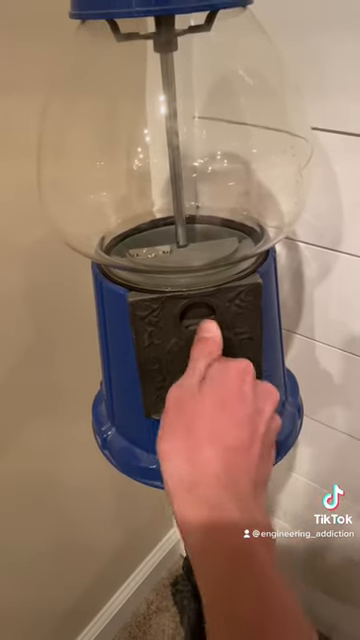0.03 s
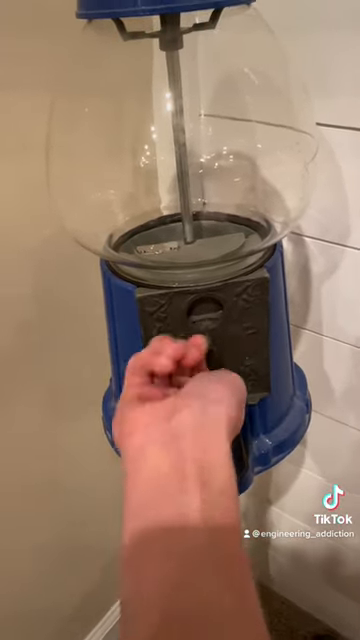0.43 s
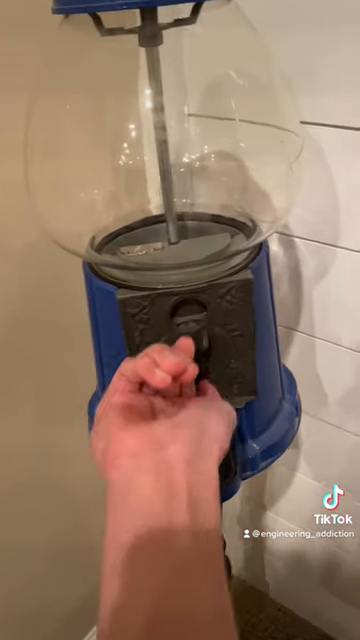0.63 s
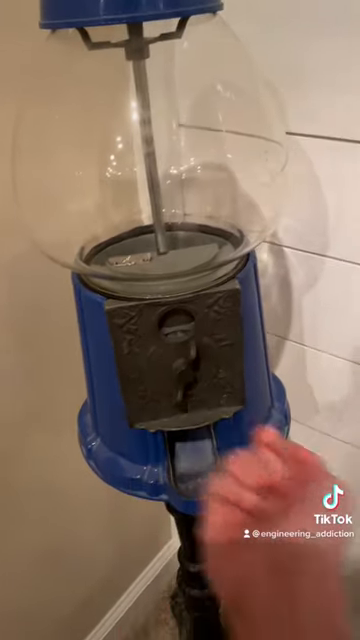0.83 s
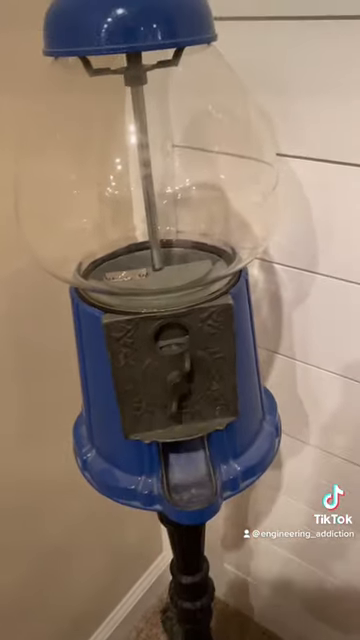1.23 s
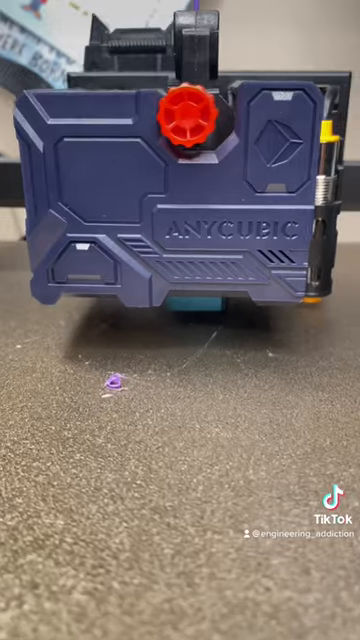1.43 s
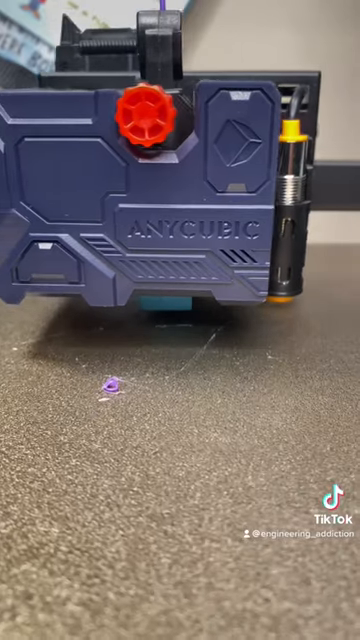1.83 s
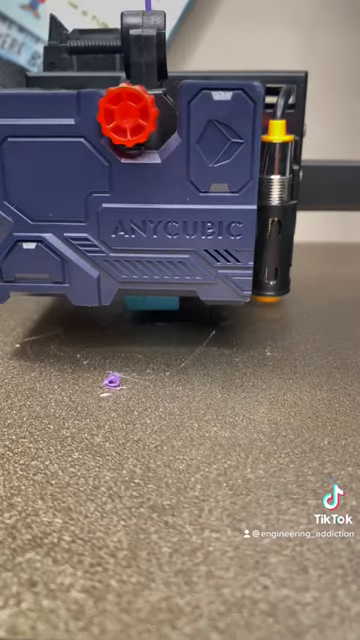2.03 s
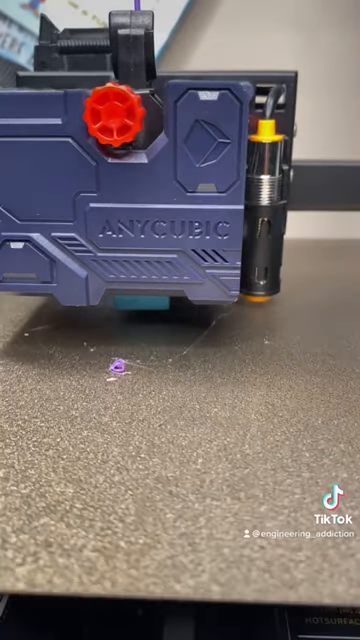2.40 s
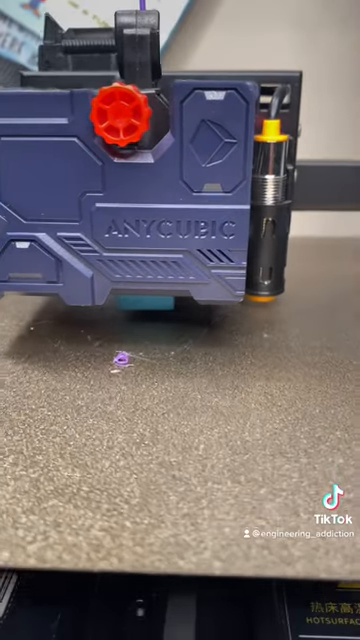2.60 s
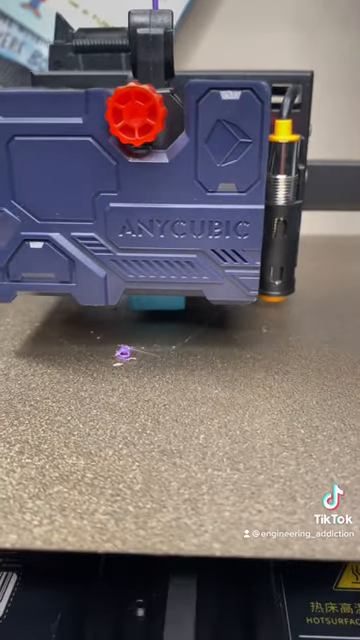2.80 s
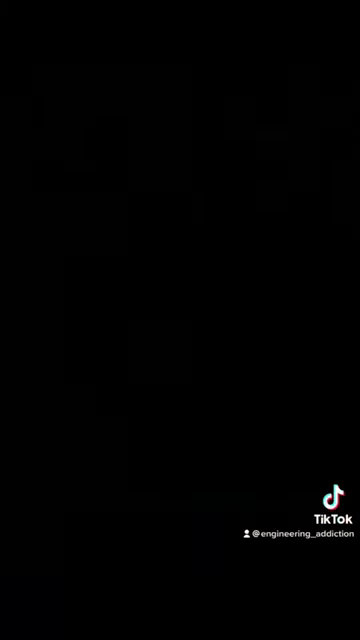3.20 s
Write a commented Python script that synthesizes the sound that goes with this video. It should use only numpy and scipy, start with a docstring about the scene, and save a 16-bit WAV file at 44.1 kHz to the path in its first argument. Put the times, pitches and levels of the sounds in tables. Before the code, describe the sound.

A gumball machine crank ratchets with sharp snaps, knocks and gritty grinding in a small room. After a short lull, a 3D printer's fan abruptly rushes close up with a thin motor whine, then drops to a low hum.

```python
"""Sharp snaps, knocks and grinding: a hand cranks a gumball machine. The pawl snaps over its teeth,
the gears knock and grind, and the metal housing rings in a small room. Then, abruptly, a 3D printer
close up: fan rush with blade tones, a thin whine, a drone and a gliding motor. The rush drops at the
end and leaves a low hum. Soft handling bumps run through both scenes."""
import sys
import numpy as np
from scipy import signal
from scipy.fft import rfft, irfft
from scipy.io import wavfile

SR = 44100
rng = np.random.default_rng(int(sys.argv[2]) if len(sys.argv) > 2 else 0)


def generate_wav(sig):
    """Save sig (samples, or channels by samples) to the path in sys.argv[1] as 16-bit PCM at SR."""
    pcm = np.round(np.clip(np.atleast_2d(sig).T, -1, 1) * 32767).astype(np.int16)
    wavfile.write(sys.argv[1], SR, pcm)


N = 147735
T, HZ = np.arange(N) / SR, np.fft.rfftfreq(N, 1 / SR)

# Stereo images. Each row: frequency in Hz, coherence 0-1, left lead in rad, left minus right in dB.
CRANK_STEREO = [(60.1, 1, -1, 0), (400, 0.06, 0.5, -5), (950, 1, 1, -1), (2142, 0.6, -1.5, -0.5),
                (3500, 0, 4.5, -2), (4340, 1, 8, -4), (5160, .85, 7.5, -1), (7170, 0.96, 9, -0.5),
                (9800, 0.5, 13, 0), (12850, 0.99, 15, 0), (16020, 0.9, 18.5, -0.5)]
PRINTER_STEREO = [(60, 0.95, 0, 0.5), (201, 0.92, 0.5, 0), (426, 1, 1, 4.5), (1190, 1, 1.97, 10.5),
                  (1600, 0.092, -0.5, 8.5), (2080, 0.085, 3, -8.5), (3070, 0.66, 4, 0),
                  (5130, 0.43, 3.5, -1.5), (5280, 1, 7.5, 1), (6940, 1, 8.5, -3), (8600, 1, 11, 0.5),
                  (11000, 1, 12, 0), (13300, 1, 16, 0)]
# Spectrum of snaps and rattle. Each row: frequency in Hz, level in dB.
SNAP_SPECTRUM = [(100, -30), (300, -7.5), (700, -8), (1400, 0), (2400, 6), (3500, 2), (5500, 4.5),
                 (7200, -2.5), (10000, 0), (12500, -3), (15200, -11.5), (16300, -31)]


def amp(db):
    """Decibels to gain."""
    return 10 ** (np.asarray(db) / 20)


def unit(x):
    """Scale to rms 1."""
    return x / np.sqrt(np.mean(x ** 2) + 1e-20)


def over_hz(table, hz):
    """Interpolate a table on a log-frequency axis."""
    row_hz, value = np.transpose(table)
    return np.interp(np.log(hz + 1), np.log(row_hz + 1), value)


def columns(table, at):
    """Interpolate the other columns along the first."""
    first, *rest = np.transpose(table)
    return [np.interp(at, first, column) for column in rest]


def level(curve):
    """Gain over time from rows of seconds and dB."""
    return amp(columns(curve, T)[0])


def drift(rate_hz):
    """Low-passed random motion, rms 1."""
    return unit(irfft(rfft(rng.standard_normal(N)) / (1 + (HZ / rate_hz) ** 4), N))


def flicker(depth_db, rate_hz):
    """Randomly wavering gain, rms 1."""
    return unit(amp(depth_db * drift(rate_hz)))


def noise(spectrum, stereo, tilt_db_oct=0):
    """Coloured stereo noise, rms 1."""
    coherence, lead_rad, balance_db = columns(stereo, HZ)
    coherence = np.clip(coherence, 0, 1)
    common, separate = rfft(rng.standard_normal((2, N)))
    left = common * amp(balance_db / 2)
    right = coherence * common + np.sqrt(1 - coherence ** 2) * separate
    right = right * np.exp(-1j * lead_rad) * amp(-balance_db / 2)
    shape_db = over_hz(spectrum, HZ) + tilt_db_oct * np.log2(np.maximum(HZ, 300) / 4000)
    return unit(irfft(np.array([left, right]) * amp(shape_db), N))


def tone(hz, lead_rad=0):
    """Stereo sine, rms 1, left leading by lead_rad."""
    phase = 2 * np.pi * (np.cumsum(hz * np.ones(N)) / SR + rng.random())
    return np.sqrt(2) * np.sin([phase, phase - lead_rad])


def fade(t, t60_s):
    """Unity until time zero, then exponential decay."""
    return np.exp(-np.log(1000) * np.maximum(t, 0) / t60_s)


def ramp(start_s, rise_s):
    """Linear rise from 0 to 1."""
    return np.clip((T - start_s) / rise_s, 0, 1)


def blow(start_s, rise_s, t60_s):
    """Impact envelope: linear attack, exponential decay."""
    return ramp(start_s, rise_s) * fade(T - start_s - rise_s, t60_s)


def swell(start_s, length_s):
    """Half-sine envelope."""
    return np.sin(np.pi * ramp(start_s, length_s))


def room_tone():
    """Faint low noise behind the gumball machine."""
    # Each row: time in seconds, level in dB.
    loudness = [(0, -56.5), (.75, -57), (.95, -62), (1.2, -56.5), (1.235, -64), (1.3, -61.5)]
    # Each row: frequency in Hz, level in dB.
    spectrum = [(20, -23), (55, 3), (90, -12), (140, -13.5), (220, -19.5), (600, -28.5), (1500, -34.5),
                (5000, -41), (10000, -49.5), (16000, -60)]
    return level(loudness) * noise(spectrum, CRANK_STEREO)


def room_reverb(x):
    """Diffuse tail; each band decays at its own rate."""
    # Each row: frequency in Hz, T60 in seconds.
    decay = [(150, .35), (700, 0.23), (2000, 0.49), (4200, 0.64), (5100, .5), (5700, 0.67), (7000, 0.25),
             (10000, 0.28), (16000, 0.35)]
    hz, t, bands = signal.stft(rng.standard_normal((2, SR)), SR, nperseg=256)
    bands = bands * fade(t, over_hz(decay, hz)[:, None])
    tail = signal.istft(bands, SR)[1][:, :SR] * ramp(0, rise_s=0.0053)[:SR]
    return signal.fftconvolve(x, tail / np.linalg.norm(tail[0]), axes=1)[:, :N]


def handling():
    """Handling bumps: short low sines and hollow bursts of band noise."""
    # Each row: start in seconds, pitch in Hz, level in dB, length in seconds.
    thumps = [(0.125, 240, -30.5, .012), (1.303, 406, -28, 0.01), (.765, 150, -48, 0.034),
              (0.804, 143, -51, 0.022), (0.976, 135.5, -50.5, 0.049), (1.155, 98.2, -59, 0.038),
              (1.506, 66, -34.5, 0.062), (2.243, 80, -26, 0.044), (2.619, 56, -25.5, 0.038),
              (2.773, 103.8, -27.5, 0.038), (3.173, 123, -29, 0.011), (3.198, 69, -29, 0.041)]
    # Each row: start in seconds, centre in Hz, level in dB, length in seconds, width in octaves.
    clunks = [(0.122, 286, -36.5, 0.018, 1), (0.754, 248, -64, 0.048, 0.46),
              (0.955, 353, -65.5, 0.083, 0.6), (1.146, 560, -57, 0.014, 0.35),
              (1.147, 1497, -56, 0.0046, 0.3), (1.15, 1536, -74, 0.1, 0.27),
              (3.172, 710, -40, 0.0082, 0.41), (3.213, 1730, -46, 0.055, 0.14)]
    out = np.zeros(N)
    for start_s, hz, db, length_s in thumps:
        out += amp(db) * swell(start_s, length_s) * np.sin(2 * np.pi * hz * (T - start_s))
    white = rfft(rng.standard_normal(N))
    for start_s, hz, db, length_s, width_oct in clunks:
        band = irfft(white / (1 + (np.log2((HZ + 1) / hz) / width_oct) ** 4), N)
        out += amp(db) * swell(start_s, length_s) * unit(band)
    return out


def hum():
    """Low rising hum over a softer rush."""
    # Each row: time in seconds, pitch in Hz, level in dB.
    glide = [(3.235, 115.7, -71), (3.255, 124, -33.5), (3.315, 129, -35), (3.35, 141.5, -32)]
    # Each row: time in seconds, level in dB.
    rush_loudness = [(3.14, -39), (3.24, -37.5), (3.29, -40.5), (3.35, -39)]
    # Each row: frequency in Hz, level in dB.
    rush_spectrum = [(20, -11), (55, 9), (150, 8), (350, -5.5), (600, -10), (1800, -13), (3500, -10.5),
                     (6000, -20), (11000, -30.5), (16000, -46)]
    hz, db = columns(glide, T)
    rush = level(rush_loudness) * noise(rush_spectrum, PRINTER_STEREO)
    return rush + (T > glide[0][0]) * amp(db) * tone(hz)


def fan():
    """Turbulent air, wavering blade tones and one thin clean tone that creeps upward."""
    # Each row: time in seconds, level in dB.
    rush_loudness = [(1.3, -32.5), (1.9, -32), (2.25, -32), (2.45, -31.5), (2.65, -32), (2.9, -32),
                     (3.14, -32.5)]
    # Each row: frequency in Hz, level in dB.
    rush_spectrum = [(20, -53), (42, 2), (75, -2.5), (105, -9), (127, -2.5), (180, -11), (240, -8.5),
                     (340, -5), (420, 0), (500, -5), (640, -5.5), (780, -10.5), (1200, -7.5), (1370, -12),
                     (1580, -10), (1850, -13), (2250, -13.5), (2500, -10.5), (3050, -13.5), (3300, -16),
                     (4700, -20), (5100, -25.5), (6000, -24), (8000, -36.5), (10000, -34.5), (12000, -40.5),
                     (14000, -49), (16000, -66)]
    # Each row: pitch in Hz, level in dB, left lead in rad, rms wander in Hz.
    blade_tones = [(125.6, -50, -0.5, 4), (323, -57, 1.2, 2.4), (528.6, -36.5, 1.5, 0.41),
                   (696, -52.5, 0, 4.5), (847, -49.5, 4.5, 3.7), (1049, -53.5, 0.1, 2.7),
                   (1157, -52.5, 0.5, 2.9), (1197, -55.5, 1, 3.5), (1485, -52, 1, 4.3), (2035, -54, 8, 3.6),
                   (2635, -46, 9.5, 8.2), (2920, -48.5, 4, 8.3), (3230, -66, 1, 12), (3460, -59, 8.5, 5)]
    # Each row: time in seconds, pitch in Hz, level in dB.
    thin_tone = [(1.3, 2311, -45.5), (1.9, 2331, -44.5), (2.35, 2333, -44), (2.56, 2338, -48),
                 (2.7, 2334, -45), (3.14, 2363, -46)]
    out = level(rush_loudness) * amp(0.5 * drift(rate_hz=50)) * noise(rush_spectrum, PRINTER_STEREO)
    for hz, db, lead_rad, wander_hz in blade_tones:
        gain = amp(db + 1.44 * drift(rate_hz=15))
        out += gain * tone(hz + wander_hz * drift(rate_hz=24.2), lead_rad)
    thin_hz, thin_db = columns(thin_tone, T)
    return out + amp(thin_db) * tone(thin_hz, lead_rad=1.7)


def motor_whine(hz=5231.4, octave_db=-22):
    """Thin whine of near-steady pitch that fades away."""
    # Each row: time in seconds, level in dB.
    loudness = [(1.3, -62.5), (1.35, -46.5), (1.7, -49.5), (2, -53), (2.2, -59), (2.39, -61), (2.47, -80)]
    gain = level(loudness) * flicker(depth_db=2.2, rate_hz=19)
    return gain * (tone(hz + drift(rate_hz=12)) + amp(octave_db) * tone(2 * hz))


def motor_drone(hz=415.5, wander_hz=22):
    """Rough drone that swells and ebbs, louder on the left."""
    # Each row: time in seconds, level in dB.
    loudness = [(1.3, -39), (1.9, -51), (2.22, -35), (2.35, -64), (2.52, -42.5), (2.62, -35.5), (2.76, -34),
                (2.86, -55), (3.14, -55)]
    gain = level(loudness) * flicker(depth_db=3.2, rate_hz=13) * amp([[2], [-2]])
    return gain * tone(hz + wander_hz * drift(rate_hz=43.3), lead_rad=1.0)


def motor_whistle(jitter_hz=75, octave_db=-25):
    """Whistle that sinks and climbs again; fast pitch jitter makes it fuzzy."""
    # Each row: time in seconds, pitch in Hz, level in dB.
    glide = [(2.42, 5150, -66), (2.48, 5130, -45), (2.53, 4960, -44.5), (2.585, 4660, -53),
             (2.66, 4090, -44), (2.7, 3970, -52), (2.745, 3890, -50), (2.8, 4100, -41), (2.885, 4685, -52),
             (2.945, 4970, -46), (2.99, 5080, -55), (3.04, 5190, -55), (3.1, 5230, -68)]
    hz, db = columns(glide, T)
    hz = hz + jitter_hz * drift(rate_hz=330)
    gain = amp(db) * flicker(depth_db=2, rate_hz=70)
    return gain * (tone(hz, lead_rad=4.57) + amp(octave_db) * tone(2 * hz, lead_rad=5.5))


def housing_ring(x):
    """The metal body's modes ring with every blow."""
    # Each row: frequency in Hz, level in dB, T60 in seconds.
    modes = [(280, -11, 0.14), (490.4, -1.5, .2), (581, -20.5, .45), (690, -6, 0.47), (938, 1.5, 0.13),
             (1108, -2, 0.13), (1349, -4, 0.084), (1680, -4.5, 0.12), (1810, -5.5, 0.12),
             (1985, -6.5, 0.055), (2300, 1, 0.1), (2530, -9, .14), (2960, -4.5, 0.23), (3375, -0.5, 0.11),
             (3849, -3, 0.19), (4336, -0.5, 0.15), (6000, -0.5, .06)]
    t = T[:SR]
    ring = sum(amp(db) * fade(t, t60_s) * np.cos(2 * np.pi * hz * t) for hz, db, t60_s in modes)
    return signal.fftconvolve(x, ring[None] / np.linalg.norm(ring), axes=1)[:, :N]


def housing_clang(start_s, hz, db, boom_db):
    """A blow excites one housing pitch; the lowest mode builds more slowly into a boom."""
    clang = amp(db) * blow(start_s, rise_s=0.00092, t60_s=0.059) * tone(hz)
    boom = amp(boom_db) * blow(start_s, rise_s=0.0046, t60_s=0.11) * tone(hz=278)
    return clang + boom


def rattle(start_s=0.477, hold_s=0.058, db=-30.5):
    """Loose parts shiver after the last tooth."""
    envelope = (T > start_s) * fade(T - start_s - hold_s, t60_s=0.17)
    shiver = flicker(depth_db=2.8, rate_hz=300)
    return amp(db) * envelope * shiver * noise(SNAP_SPECTRUM, CRANK_STEREO, tilt_db_oct=-0.8)


def gear_grind():
    """Turning gears make gritty, fluttering noise."""
    # Each row: time in seconds, level in dB.
    loudness = [(.01, -61.5), (.108, -59), (.125, -44.5), (.19, -36), (.24, -41), (.28, -37), (.37, -37.5),
                (.4, -44.5), (.44, -38), (.47, -35.5), (.51, -37.5), (.56, -45), (.62, -55)]
    # Each row: frequency in Hz, level in dB.
    spectrum = [(80, -18), (190, -9.5), (280, 2.5), (380, -6.5), (490, 5), (620, -3.5), (1400, 1.5),
                (2500, -2), (5000, -14.5), (12000, -24), (16000, -42)]
    start_s, stop_s = loudness[0][0], loudness[-1][0]
    envelope = (T > start_s) * fade(T - stop_s, t60_s=0.55) * level(loudness)
    return envelope * flicker(depth_db=4, rate_hz=75) * noise(spectrum, CRANK_STEREO)


def gear_knocks():
    """Dull knocks of the mechanism, each clanging the housing."""
    # Each row: start in seconds, level in dB, T60 in seconds, clang in Hz, clang in dB, boom in dB.
    knocks = [(.001, -43.5, 0.049, 1360, -63.5, -65.5), (0.0356, -35, 0.047, 897, -52.5, -65.5),
              (0.1363, -16.5, 0.067, 1662, -24, -54.5), (0.1682, -19, 0.054, 490, -36, -35.5),
              (0.354, -29, 0.11, 1104, -40.5, -51.5), (0.365, -36, .06, 1985, -42.5, -50.5),
              (0.428, -26, 0.079, 1516, -26.5, -43), (0.453, -36, 0.15, 495, -40, -52)]
    # Each row: frequency in Hz, level in dB.
    spectrum = [(100, -23), (300, -13.5), (700, -7), (1300, 0.5), (2200, 5), (3500, -7), (6000, -10),
                (12000, -31.5), (16000, -39.5)]
    thud = noise(spectrum, CRANK_STEREO)
    out = np.zeros((2, N))
    for start_s, db, t60_s, *clang in knocks:
        out += amp(db) * blow(start_s, rise_s=0.00053, t60_s=t60_s) * thud
        out += housing_clang(start_s, *clang)
    return out


def pawl_ring(start_s, spread_db=3.5, right_delay_s=0.00019):
    """The steel pawl rings briefly, its modes weighted anew at every tooth."""
    # Each row: frequency in Hz, level in dB, T60 in seconds.
    modes = [(2340, -8, .07), (2530, -6, .06), (3140, -6, 0.088), (3580, -6.5, 0.093), (4320, -6, 0.092),
             (4510, -2.5, .06), (5530, -3.5, 0.0503), (5780, -2, .06), (7140, -0.5, 0.02), (9000, 4, .04),
             (10200, 0.5, 0.028), (11300, -5, .035), (14900, -6.5, .03)]
    t, out = T[:SR // 4], np.zeros((2, N))
    at = round(start_s * SR)
    for hz, db, t60_s in modes:
        phase = 2 * np.pi * (hz * np.array([t, t - right_delay_s]) + rng.random())
        gain = amp(db + spread_db * rng.standard_normal())
        out[:, at:at + len(t)] += gain * fade(t, t60_s) * np.sin(phase)
    return out


def pawl_snaps(slide_s=0.0046, slide_db=-15.5, crack_db=3, ring_db=-15.5):
    """The pawl slides up each tooth, drops with a crack, rings and clangs the housing."""
    # Each row: start in seconds, level in dB, tilt in dB per octave, T60 in seconds, rise in seconds,
    # clang in Hz, clang in dB, boom in dB.
    snaps = [(0.1225, -18, -0.5, 0.049, 0.0037, 2000, -35.5, -61),
             (0.1326, -11, 3.5, 0.049, 0.0008, 1100, -28.5, -47),
             (0.2074, -13, 3, 0.043, 0.001, 1840, -32, -51),
             (0.2572, -13, 3, 0.044, 0.00054, 948, -27, -52.5),
             (0.3204, -13.5, -0.5, 0.036, 0.0011, 947, -32.5, -42.5),
             (0.4118, -21, -0.8, 0.054, 0.0029, 1490, -31, -50),
             (0.4821, -10.5, 0, 0.049, 0.0015, 1347, -24.5, -35)]
    out = np.zeros((2, N))
    for start_s, db, tilt_db_oct, t60_s, rise_s, *clang in snaps:
        slide = amp(slide_db) * np.exp(-abs(T - start_s) / slide_s)
        crack = amp(crack_db) * ramp(start_s, rise_s) * fade(T - start_s, t60_s=0.01)
        envelope = slide + crack + blow(start_s, rise_s, t60_s)
        out += amp(db) * envelope * noise(SNAP_SPECTRUM, CRANK_STEREO, tilt_db_oct)
        out += amp(db + ring_db) * pawl_ring(start_s) + housing_clang(start_s, *clang)
    return out


def scene(housing_db=-16.5, reverb_db=-20):
    """The gumball machine, then the printer and its closing hum."""
    crank = pawl_snaps() + gear_knocks() + gear_grind() + rattle()
    machine = crank + amp(housing_db) * housing_ring(crank)
    gumball = machine + amp(reverb_db) * room_reverb(machine) + room_tone()
    printer = fan() + motor_whine() + motor_drone() + motor_whistle()
    on, off = ramp(start_s=1.3035, rise_s=0.00055), ramp(start_s=3.142, rise_s=0.0005)
    return (1 - on) * gumball + on * (1 - off) * printer + off * hum() + handling()


def record(dry):
    """Soft-clip the peaks, then low-pass at 16.5 kHz."""
    rounded = dry / (1 + dry ** 6) ** (1 / 6)
    lowpass = signal.firwin(255, 16500, window=("kaiser", 9), fs=SR)
    return signal.oaconvolve(rounded, lowpass[None], "same")


dry = scene()
out = record(dry)
generate_wav(out)
```